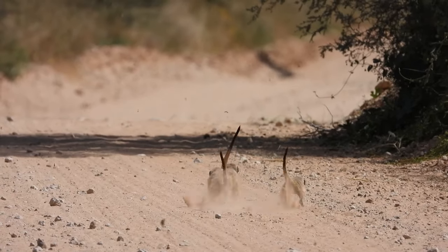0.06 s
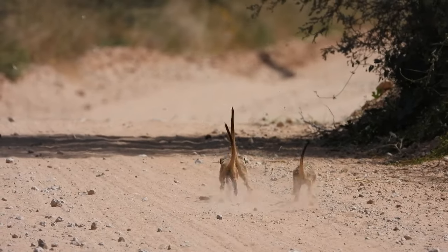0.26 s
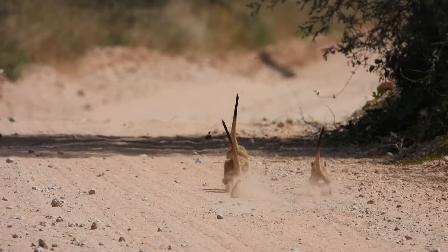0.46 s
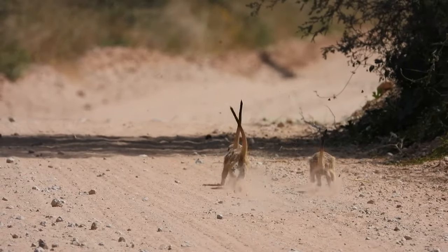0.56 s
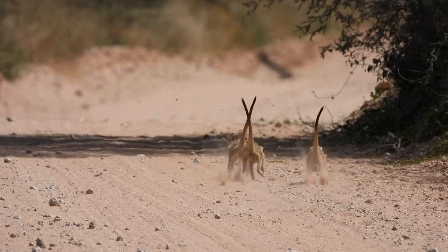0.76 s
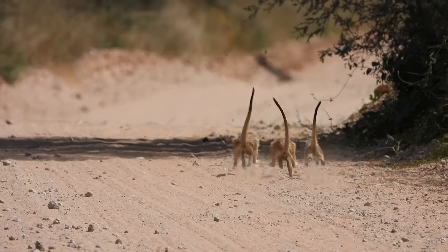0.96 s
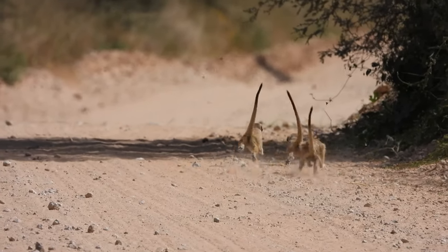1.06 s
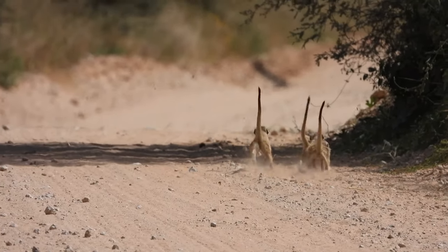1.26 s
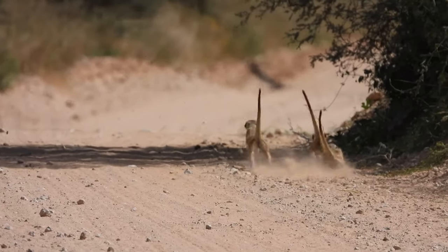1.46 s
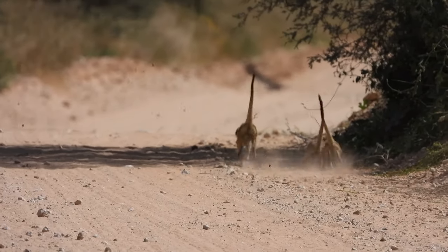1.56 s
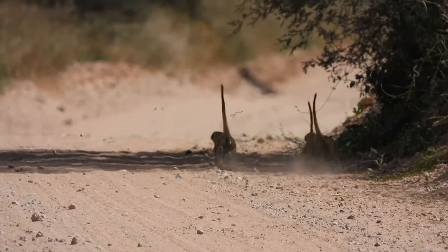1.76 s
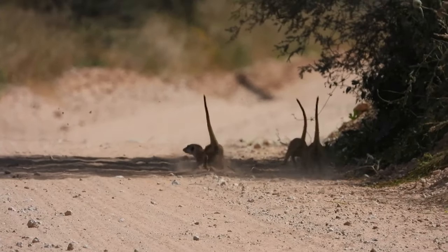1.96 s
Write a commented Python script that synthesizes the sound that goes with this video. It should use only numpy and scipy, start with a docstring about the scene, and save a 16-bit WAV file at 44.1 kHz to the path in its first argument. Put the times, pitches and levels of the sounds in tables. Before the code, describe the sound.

Small wild mammals give quick paired chirps and falling squeals on an open sandy track

```python
"""Meerkats run down a sandy track, under a faint outdoor hush of filtered noise with a low, uneven mutter.
They call in pairs: first a thin falling chirp, made of harmonics on a gliding pitch, sometimes ending
in a reedy whimper. Soft low thumps, brief sagging sines, come between. Then follow a short catch
and a steep squeal that sinks into a whimper; a faint trill of tiny falling notes passes once.
Reflections and decaying noise echoes scatter the calls from ground and bushes."""
import sys
import numpy as np
from scipy import signal
from scipy.fft import rfft, irfft
from scipy.io import wavfile

SR = 44100
rng = np.random.default_rng(int(sys.argv[2]) if len(sys.argv) > 2 else 0)


def materialize(psi):
    """Save the field psi as 16-bit PCM at rate SR to the path in sys.argv[1].

    A 1-D psi becomes a single channel; in a 2-D psi each row is a channel.
    """
    bounded = np.clip(np.atleast_2d(psi).T, -1, 1)
    quanta = np.round(bounded * 32767).astype(np.int16)
    wavfile.write(sys.argv[1], SR, quanta)


N = 88200  # length in samples


def from_db(db):
    """Logarithmic level: decibels become an amplitude ratio."""
    return 10 ** (np.asarray(db) / 20)


def at_hz(points, hz):
    """Logarithmic frequency scale: read a curve between its points along log frequency."""
    point_hz, value = np.transpose(points)
    return np.interp(np.log(np.maximum(hz, 1)), np.log(point_hz), value)


def colour(x, points):
    """Linear filtering: scale each frequency by a response in dB."""
    size = x.shape[-1]
    gain = from_db(at_hz(points, np.fft.rfftfreq(size, 1 / SR)))
    return irfft(rfft(x) * gain, size)


def wobble(rate_hz, size):
    """Band-limited fluctuation: low-passed noise gives a smooth random motion of spread 1."""
    lowpass = signal.butter(2, rate_hz, fs=SR, output="sos")
    slow = signal.sosfilt(lowpass, rng.standard_normal(size + SR // 4))
    return (slow / slow.std())[-size:]  # the filter's start is dropped


def stereo_noise(likeness, size):
    """Partial coherence: mid and side noises are mixed so that two channels correlate by likeness."""
    mid, side = rfft(rng.standard_normal((2, size)))
    likeness = np.clip(likeness, -1, 1)
    common = np.sqrt((1 + likeness) / 2) * mid
    opposed = np.sqrt((1 - likeness) / 2) * side * [[1], [-1]]
    return irfft(common + opposed, size)


def add(out, start_s, sound):
    """Superposition: mix a sound in at its start time."""
    i = max(int(start_s * SR), 0)
    out[i:i + len(sound)] += sound[:N - i]


# Spectrum of the outdoor hush. Each row: frequency in Hz, relative level in dB per Hz.
HUSH_SPECTRUM = [(30, -32), (90, -18), (130, -10), (175, 3.5), (270, -6.5), (450, -3.5), (700, -8),
                 (820, -1.5), (930, -10.5), (1500, -14), (2800, -15.5), (4200, -18.5), (6500, -21.5),
                 (9500, -38), (15000, -58.5)]
# Coherence of the hush between the channels. Each row: frequency in Hz, likeness from -1 to 1.
AIR_LIKENESS = [(60, .1), (200, .5), (640, .87), (1400, .78), (3100, .5), (7000, .1)]
HUSH_DB = -56


def hush():
    """Stationary diffuse noise: faint, steady air whose channel coherence depends on frequency."""
    likeness = at_hz(AIR_LIKENESS, np.fft.rfftfreq(N, 1 / SR))
    air = colour(stereo_noise(likeness, N), HUSH_SPECTRUM)
    return from_db(HUSH_DB) * air / air.std()


# Spectrum of the low mutter. Each row: frequency in Hz, relative level in dB.
MUTTER_SPECTRUM = [(60, -39.5), (110, -18.5), (170, 2.5), (230, -3), (350, -4.5), (600, -20), (1500, -66)]
MUTTER_DB, MUTTER_SWING_DB, MUTTER_SWING_HZ = -66.5, 4, 9


def mutter():
    """Amplitude modulation: low, lumpy noise comes and goes on a slow random level."""
    low = colour(stereo_noise(0.21, N), MUTTER_SPECTRUM)
    level = from_db(MUTTER_DB + MUTTER_SWING_DB * wobble(MUTTER_SWING_HZ, N))
    return level * low / low.std()


# Colour of the rasp in the animal's voice. Each row: frequency in Hz, relative level in dB.
RASP_COLOUR = [(1200, -22), (2700, 1.5), (3600, -8.5), (4500, -10.5), (6000, -3.5), (7500, -4), (9500, -5),
               (12500, -14.5), (15000, -32.5)]
EDGE_S = 0.0011  # the voice starts and stops this fast


def voice(curve, harmonic_db, rasp_db, relax_db_per_s, jitter, shimmer_db):
    """Harmonic series: whole multiples of an unsteady pitch, with a little rasp and quick edges."""
    s, hz, db = np.transpose(sorted(map(tuple, curve)))
    t = np.arange(s[0] - EDGE_S / 2, s[-1] + EDGE_S, 1 / SR)
    pitch = np.interp(t, s, hz) * (1 + jitter * wobble(600, SR // 4)[:len(t)])
    to_edge_s = np.minimum(t - t[0], t[-1] - t)
    gate = np.sin(np.pi / 2 * np.clip(to_edge_s / EDGE_S, 0, 1)) ** 2
    level = gate * from_db(np.interp(t, s, db) + shimmer_db * wobble(200, SR // 4)[:len(t)])
    phase = 2 * np.pi * np.cumsum(pitch) / SR
    harmonics = []
    for k in range(1, 8):
        gain = np.sqrt(2) * from_db(harmonic_db(k, k * pitch))
        below_nyquist = k * pitch < SR / 2
        harmonics.append(gain * below_nyquist * np.sin(k * phase))
    first, *overtones = harmonics
    rasp = from_db(rasp_db) * colour(rng.standard_normal(SR // 4), RASP_COLOUR)[:len(t)]
    relax = from_db(-relax_db_per_s * (t - t[0]))
    out = np.zeros(N)
    add(out, t[0], level * (first + relax * (sum(overtones) + rasp)))
    return out


# Colour of the whistled calls' overtones. Each row: frequency in Hz, added level in dB.
OVERTONE_COLOUR = [(2500, 21), (3600, 13), (4500, -11), (6000, -9.5), (7700, 3.5), (9500, -9.5),
                   (12500, -3), (14500, -19)]
OVERTONE_STEP_DB = -10.5  # each further harmonic, before the colour
RELAX_DB_PER_S = 137  # overtones and rasp fade as the throat relaxes through a call


def whistles(curves, overtones_db, jitter, shimmer_db):
    """Spectral slope: nearly pure glides; a more pressed voice has more overtones and rasp."""
    out = 0
    for curve, second_db in zip(curves, overtones_db):
        def harmonic_db(k, hz):
            """Spectral envelope: overtones step down from the second harmonic, then are coloured."""
            if k == 1:
                return 0
            return second_db + OVERTONE_STEP_DB * (k - 2) + at_hz(OVERTONE_COLOUR, hz)
        out = out + voice(curve, harmonic_db, second_db, RELAX_DB_PER_S, jitter, shimmer_db)
    return out


# First call of each pair, one curve per call.
# Each row: time in seconds, pitch in Hz, level in dB before the chirps' common gain.
CHIRP_CURVES = [
    [(0.001, 1480, -51.5), (0.007, 1677, -41), (0.012, 1882, -46.5), (0.02, 2032, -33),
     (0.0309, 2092, -36.5), (0.0429, 1941, -40.5), (0.054, 1270, -43.5)],
    [(0.216, 3590, -35), (0.222, 3216, -29.5), (0.2315, 3023, -19), (0.2409, 2860, -19.5),
     (0.2459, 2632, -25), (0.2544, 2513, -27), (0.2649, 2476, -19.5), (0.2719, 2540, -41.5),
     (0.2833, 2018, -31.5), (0.2893, 1690, -45), (0.2973, 1630, -30.5), (0.3028, 1428, -35),
     (0.323, 1474, -49.5)],
    [(0.658, 4247, -48.5), (0.664, 3356, -30.5), (0.6685, 3260, -43), (0.6834, 3146, -28.5),
     (0.6929, 3017, -18.5), (0.6959, 3026, -24), (0.7034, 2889, -21.5), (0.7099, 3134, -36.5),
     (0.7139, 2300, -26.5), (0.7203, 1800, -49), (0.7273, 1530, -41.5), (0.731, 1290, -49)],
    [(1.084, 5576, -35), (1.089, 4556, -24), (1.0975, 4194, -35), (1.1049, 4070, -28), (1.1299, 3660, -27),
     (1.1449, 3470, -21), (1.1528, 2992, -20), (1.1638, 2390, -25), (1.1718, 1788, -38),
     (1.1773, 1706, -60), (1.1823, 1766, -41.5), (1.1902, 2637, -23), (1.1952, 2970, -22.5),
     (1.2032, 3152, -30.5), (1.212, 3126, -26.5)],
    [(1.5075, 3280, -36), (1.5105, 3440, -37), (1.517, 3862, -31), (1.5284, 3670, -26),
     (1.5339, 3377, -18.5), (1.5369, 3198, -29.5), (1.5409, 3014, -19.5), (1.5494, 2293, -24),
     (1.5559, 1820, -44), (1.5579, 1647, -39), (1.5649, 1580, -33.5), (1.578, 1653, -44)],
    [(1.579, 2500, -43), (1.585, 2580, -35), (1.592, 2100, -32), (1.5984, 2290, -32), (1.6139, 2470, -27.5),
     (1.6199, 2463, -38.5), (1.623, 2660, -45)],
]
# Pressedness of each chirp. Each entry: second harmonic (before colour) and rasp setting in dB.
CHIRP_OVERTONES_DB = [-20.5, -24, -8, -13.5, -12, -20]


def chirps():
    """Frequency glide: thin, mostly falling whistles follow their pitch curves."""
    return from_db(1.22) * whistles(CHIRP_CURVES, CHIRP_OVERTONES_DB, jitter=0.011, shimmer_db=0.65)


# Low reedy ends of calls, one curve per whimper.
# Each row: time in seconds, pitch in Hz, level in dB before throat and common gain.
WHIMPER_CURVES = [
    [(0.054, 922, -46.5), (0.065, 846, -49), (0.0869, 1004, -43), (0.1049, 1144, -43.5),
     (0.1159, 1020, -44.5), (0.118, 950, -60)],
    [(0.461, 1247, -37), (0.4675, 1125, -48), (0.475, 970, -39.5), (0.497, 829, -59.5)],
    [(0.738, 1180, -48), (0.7465, 1156, -53), (0.7649, 1260, -41.5), (0.782, 1195, -55.5)],
    [(0.931, 1270, -37.5), (0.947, 830, -47.5), (0.95, 784, -45.5)],
    [(1.36, 1110, -53), (1.366, 966, -43), (1.376, 854, -55)],
    [(1.753, 1260, -36), (1.7705, 1184, -50), (1.7869, 1199, -41), (1.8069, 968, -47), (1.816, 815, -55.5)],
]
# Throat response of the whimper. Each row: frequency in Hz, gain in dB.
THROAT = [(850, 2), (1250, -12), (1800, -1.5), (2400, 4), (3100, -2.5), (4200, -39), (5500, -16.5),
          (8000, -58), (12000, -55)]


def whimpers():
    """Source and filter: a low register, rich in harmonics, is shaped by the throat."""
    out = 0
    for curve in WHIMPER_CURVES:
        out = out + voice(curve, lambda k, hz: at_hz(THROAT, hz), rasp_db=-24, relax_db_per_s=0,
                          jitter=0.006, shimmer_db=2.1)
    return from_db(-3.0) * out


# Soft low thumps.
# Each row: start in seconds, envelope peak in dB before the low cut, settling pitch in Hz, rise in seconds.
THUMPS = [(.183, -41, 232, 0.0072), (0.244, -36.5, 176.5, 0.0065), (0.439, -41.5, 219, .007),
          (.501, -37.5, 181, 0.0059), (.524, -50.5, 260, 0.0073), (0.639, -51.5, 183, 0.0089),
          (.727, -44.5, 247.5, 0.0063), (1.303, -40.5, 172, 0.0075), (1.347, -44.5, 225, .009),
          (1.446, -36, 196, 0.0053), (1.555, -41.5, 182.6, 0.0088), (1.617, -43.5, 167, 0.0058),
          (1.687, -24.5, 248, 0.0025)]
THUMP_LOW_CUT_HZ = 130


def thumps(sag, grit):
    """Damped oscillation: each thump swells and dies within a few cycles while its pitch sags."""
    out = np.zeros(N)
    t = np.arange(SR // 10) / SR
    for start_s, db, hz, rise_s in THUMPS:
        age = t / rise_s
        phase = 2 * np.pi * np.cumsum(hz * (1 + sag * np.exp(-age))) / SR
        swell = (age * np.exp(1 - age)) ** 2  # peaks at 1 after the rise
        add(out, start_s, from_db(db) * swell * (np.sin(phase) + grit * wobble(340, len(t))))
    low_cut = signal.butter(4, THUMP_LOW_CUT_HZ, "high", fs=SR, output="sos")
    return signal.sosfilt(low_cut, out)


# Short catches of the voice before a squeal, one curve per catch.
# Each row: time in seconds, pitch in Hz, level in dB.
CATCH_CURVES = [
    [(.373, 3100, -40), (.3745, 3150, -31), (.378, 3250, -40)],
    [(.824, 4100, -34), (.83, 3450, -28), (.836, 3450, -27), (.84, 4500, -27), (.843, 5200, -37)],
    [(.851, 7500, -33), (.853, 6700, -32), (.856, 5600, -41)],
    [(.848, 3480, -42), (.862, 3430, -38), (.871, 3500, -44), (.876, 4300, -44)],
    [(1.2525, 5000, -29), (1.2555, 5650, -20), (1.259, 6900, -36)],
    [(1.6645, 5100, -27), (1.666, 5600, -18), (1.669, 7000, -24), (1.6715, 7900, -31)],
]
# Pressedness of each catch. Each entry: second harmonic (before colour) and rasp setting in dB.
CATCH_OVERTONES_DB = [-8, -15.5, -13, 2, -18.5, -24]


def catches():
    """Short voiced onset: brief whistled fragments come before the squeals."""
    return whistles(CATCH_CURVES, CATCH_OVERTONES_DB, jitter=0.012, shimmer_db=3.0)


# Second call of each pair, one curve per call.
# Each row: time in seconds, pitch in Hz, level in dB before the squeals' common gain.
SQUEAL_CURVES = [
    [(0.3935, 6690, -31), (0.397, 5340, -18.5), (0.401, 4460, -29), (0.412, 4308, -27),
     (0.4229, 3600, -33.5), (0.4269, 3547, -23), (0.4329, 2950, -25.5), (0.4359, 3093, -32),
     (0.4389, 3075, -26.5), (0.4429, 2384, -26), (0.4484, 1690, -42.5), (0.4524, 1565, -32),
     (0.461, 1317, -46.5)],
    [(0.875, 4347, -36), (0.879, 4503, -21), (0.882, 4357, -26.5), (0.8855, 5635, -31), (0.8875, 5200, -37),
     (0.8929, 3672, -24), (0.8989, 2795, -23), (0.9049, 2476, -27), (0.9109, 2028, -32.5),
     (0.9159, 1697, -42), (0.9244, 1564, -39), (0.931, 1460, -49)],
    [(1.2755, 8245, -26), (1.283, 5883, -18.5), (1.288, 5320, -20), (1.2959, 5187, -22.5),
     (1.3034, 3928, -30.5), (1.3089, 2964, -20.5), (1.3169, 2370, -23.5), (1.3214, 2170, -29.5),
     (1.3314, 1767, -40.5), (1.3368, 1615, -29.5), (1.3478, 1294, -46), (1.3548, 1465, -34),
     (1.359, 1610, -37)],
    [(1.686, 7767, -24.5), (1.693, 5497, -17), (1.7, 4753, -24.5), (1.7039, 4736, -35), (1.7079, 4780, -21),
     (1.7119, 5203, -18), (1.7159, 6227, -25.5), (1.7199, 4890, -44), (1.7239, 3205, -25.5),
     (1.7289, 2464, -28), (1.7354, 1916, -35.5), (1.7379, 1646, -37.5), (1.7424, 1656, -32.5),
     (1.7493, 1550, -43.5), (1.753, 1380, -36)],
]
# Pressedness of each squeal. Each entry: second harmonic (before colour) and rasp setting in dB.
SQUEAL_OVERTONES_DB = [-15, -13, -18.5, -13]


def squeals():
    """Steep frequency glide: high whistles plunge towards the whimper's register."""
    return from_db(0.37) * whistles(SQUEAL_CURVES, SQUEAL_OVERTONES_DB, jitter=0.0036, shimmer_db=3.0)


TRILL_START_S, TRILL_END_S, TRILL_PER_S = 0.722, 0.822, 78  # notes per second
TRILL_TOP_HZ, TRILL_FALL_HZ = 6400, 1000
TRILL_DB, TRILL_WAVER_DB = -54.5, 2


def trill():
    """Periodic frequency modulation: a quick, faint run of tiny falling notes, far away."""
    out = np.zeros(N)
    t = np.arange(0, TRILL_END_S - TRILL_START_S, 1 / SR)
    turn = t * TRILL_PER_S % 1  # progress through each note
    phase = 2 * np.pi * np.cumsum(TRILL_TOP_HZ - TRILL_FALL_HZ * turn) / SR
    level = from_db(TRILL_DB + TRILL_WAVER_DB * wobble(40, N)[:len(t)])
    add(out, TRILL_START_S, level * np.sin(np.pi * turn) * np.sin(phase))
    return out


# Distinct reflections from nearby ground and bushes. Each row: delay in seconds, level in dB.
REFLECTIONS = [(.0098, -14.5), (.0165, -21)]


def reflected(x):
    """Comb interference: close echoes beat against a gliding call and split it into strands."""
    out = x.copy()
    for delay_s, db in REFLECTIONS:
        add(out, delay_s, from_db(db) * x)
    return out


# Level balance of the microphone pair. Each row: frequency in Hz, left minus right in dB.
BALANCE_DB = [(200, 1), (1600, 0), (2000, -6.5), (2500, -0.5), (3100, 0.5), (3550, -8.5), (4200, 0.5),
              (4800, -7), (5450, -5), (5950, 9), (6800, 2), (7600, -10.5), (8300, 2.5), (12000, -6.5)]
# Phase between the two capsules. Each row: frequency in Hz, lead of the left in radians.
LEFT_LEAD = [(300, 0), (1000, -.4), (1800, -.5), (2900, .1), (3500, -.7), (4100, -.8), (4500, -1.6),
             (4900, -1), (5650, -.45), (6350, -2.4), (7300, -1.8), (8300, -1.5), (9400, -2.9), (15000, -3)]


def microphones(x):
    """Interchannel difference: direct sound reaches two capsules with frequency-dependent level and phase."""
    hz = np.fft.rfftfreq(2 * N, 1 / SR)
    sides = np.array([[1], [-1]]) / 2
    gain = from_db(sides * at_hz(BALANCE_DB, hz))
    gain = gain / np.sqrt(np.mean(gain ** 2, axis=0))  # keep the mean power of the pair
    turn = np.exp(1j * sides * at_hz(LEFT_LEAD, hz))
    return irfft(rfft(x, 2 * N) * gain * turn)[:, :N]


# Near and far scatter from ground and bushes. Each row: frequency in Hz, level in dB.
NEAR_SCATTER = [(200, 0), (1000, -21.5), (1700, -10.5), (2600, -9.5), (3600, -8.5), (5500, -9.5),
                (7500, -10), (12000, -7.5)]
FAR_SCATTER = [(200, -9), (1000, -6), (2500, -28.5), (3600, -21), (4500, -11.5), (6000, -41), (8000, -35.5),
               (12000, -27.5)]
NEAR_T60_S, FAR_T60_S = 0.15, 0.39  # time to fall by 60 dB
SCATTER_DELAY_S, SCATTER_LIKENESS = 0.0026, 0.38


def scatter(x, spectrum, t60_s):
    """Diffuse reverberation: convolution with decaying noise makes countless small echoes."""
    t = np.arange(SR) / SR
    onset = np.clip(t / SCATTER_DELAY_S - 1, 0, 1)  # silent for one delay, full after two
    fade = from_db(-60 * t / t60_s) * onset
    noise = colour(stereo_noise(SCATTER_LIKENESS, SR), spectrum)
    echoes = noise * fade / np.sqrt(np.sum(fade ** 2))
    return signal.fftconvolve(x[None], echoes, axes=1)[:, :N]


def scene():
    """Superposition: direct calls and thumps, their echoes, the trill and the background add."""
    background = hush() + mutter()
    calls = chirps() + whimpers() + catches() + squeals()
    knocks = thumps(sag=0.46, grit=0.33)
    direct = microphones(reflected(calls) + knocks)
    near = scatter(calls + knocks, NEAR_SCATTER, NEAR_T60_S)
    far = scatter(calls + knocks, FAR_SCATTER, FAR_T60_S)
    return direct + near + far + trill() + background


CUTOFF_HZ = 15450


def record(dry):
    """Band limitation: an elliptic low-pass cuts the top steeply."""
    lowpass = signal.ellip(10, 0.1, 80, CUTOFF_HZ, fs=SR, output="sos")
    return signal.sosfilt(lowpass, dry)


dry = scene()
out = record(dry)
materialize(out)
```